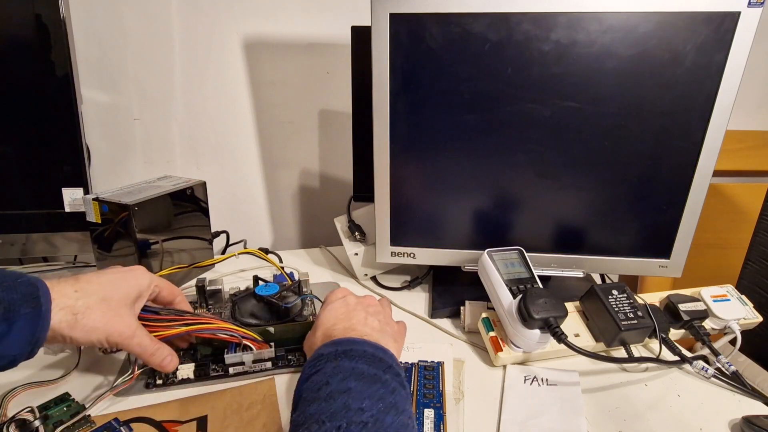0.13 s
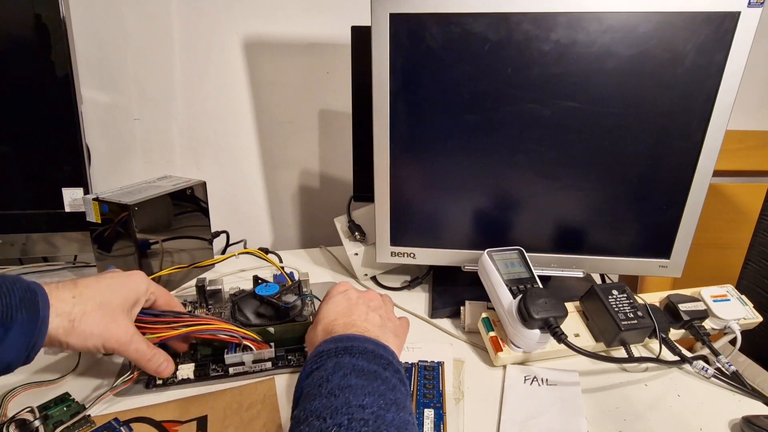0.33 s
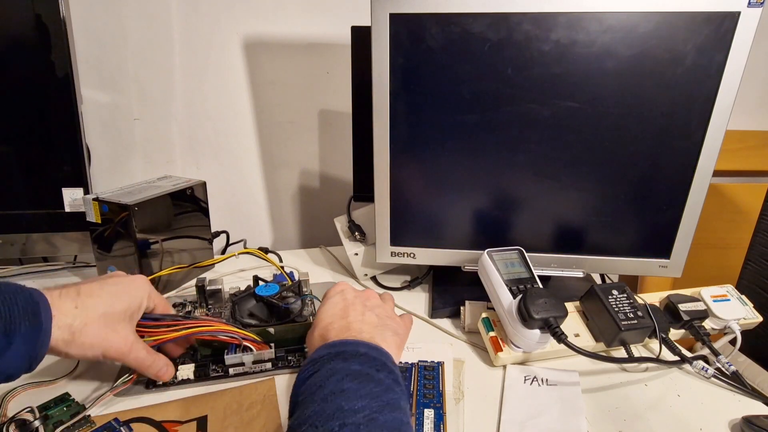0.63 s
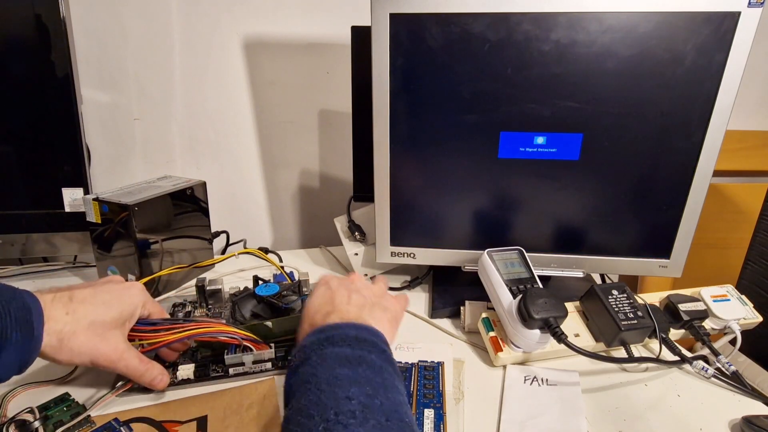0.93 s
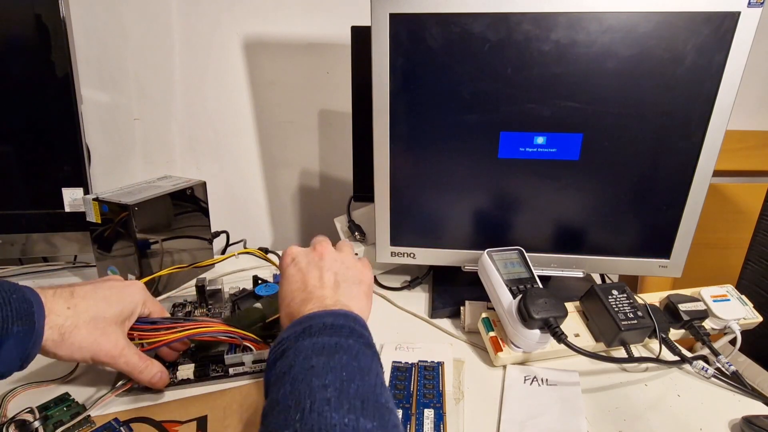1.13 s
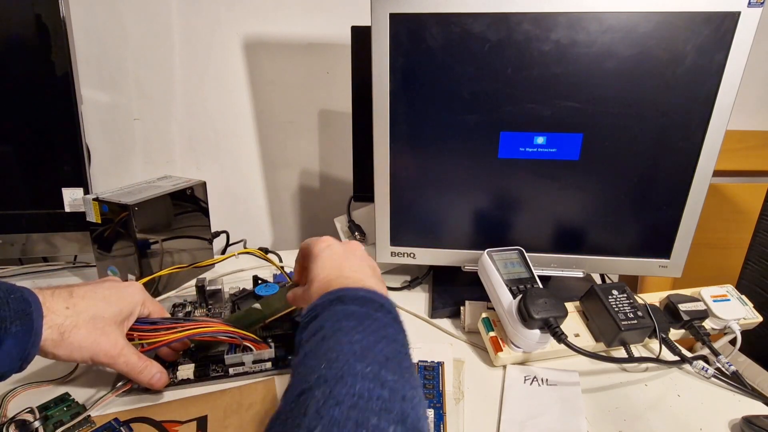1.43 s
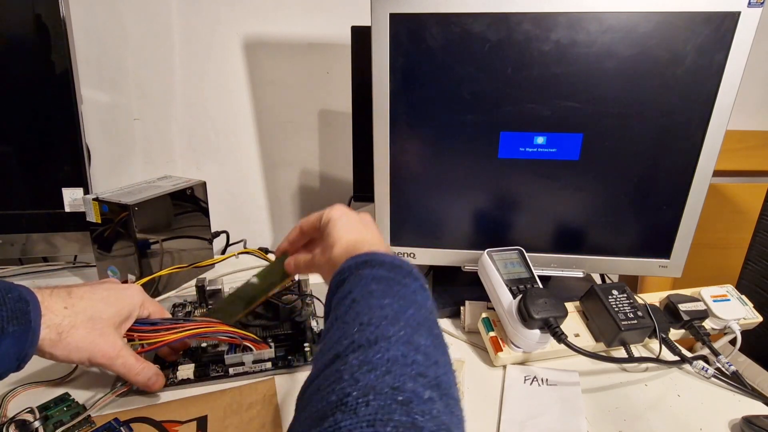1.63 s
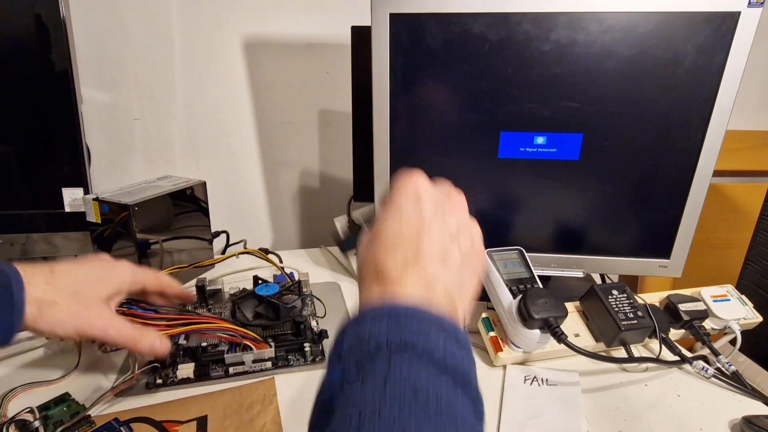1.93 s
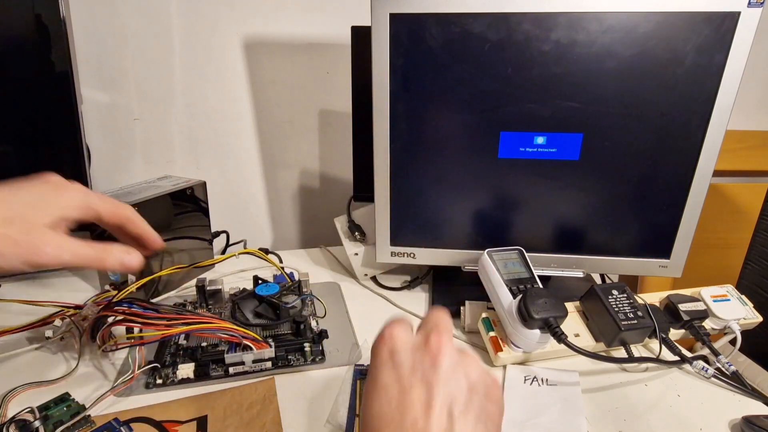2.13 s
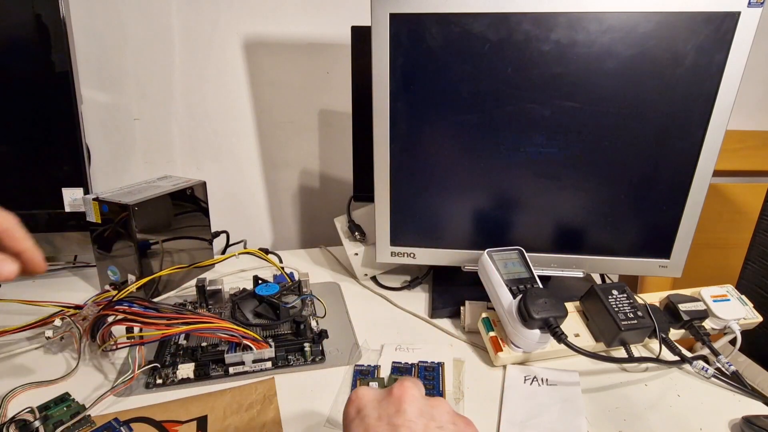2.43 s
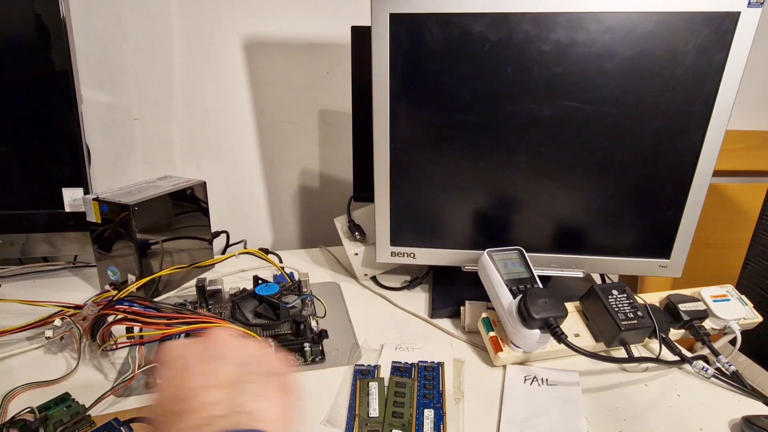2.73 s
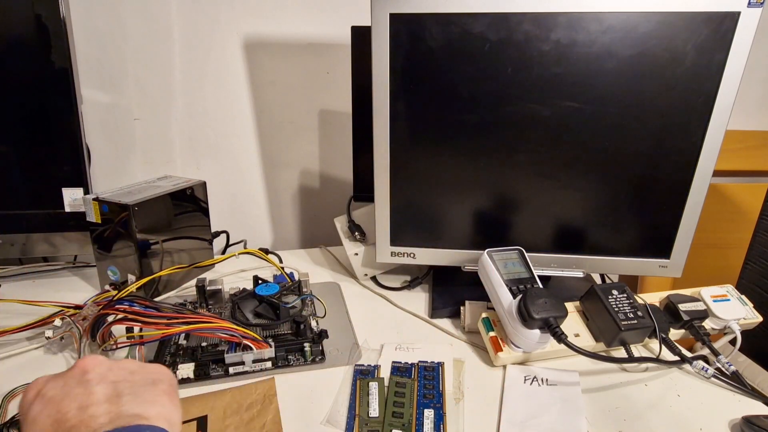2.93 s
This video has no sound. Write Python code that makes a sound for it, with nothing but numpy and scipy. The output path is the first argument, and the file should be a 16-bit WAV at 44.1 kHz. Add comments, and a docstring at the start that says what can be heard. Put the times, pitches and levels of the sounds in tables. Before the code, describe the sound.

A memory stick is worked out of a circuit board close by, with fumbling fingers, dull knocks on a desk and small plastic snaps. It then drops onto other sticks with a bright clatter, in a small quiet room.

```python
"""A memory stick is worked out of a motherboard, then tapped and dropped on a pile of other sticks.
First fingers fumble among the parts, the board rocks and knocks on the desk, the plastic latches
snap and the stick twangs in its slot. Then it lands with a bright clatter, bending, ringing and
bouncing. Each hit is made of fading tones and short bursts of noise. The small room adds a brief
echo and a quiet rumble."""
import sys
import numpy as np
from scipy import signal
from scipy.fft import rfft, irfft
from scipy.io import wavfile

SR = 44100
rng = np.random.default_rng(int(sys.argv[2]) if len(sys.argv) > 2 else 0)


def inscribe(sig):
    """Save sig as 16-bit PCM at rate SR to the path in sys.argv[1].

    A 1-D sig is mono; a 2-D sig holds one channel per row.
    Samples are clipped to [-1, 1] before scaling.
    """
    pcm = np.round(np.clip(np.atleast_2d(sig).T, -1, 1) * 32767)
    wavfile.write(sys.argv[1], SR, pcm.astype(np.int16))


N = 136710
TAIL = SR // 2  # samples in one ringing sound
T = np.arange(TAIL) / SR

# Tone colours of stick on stick, plastic slot and latch: (frequency [Hz], relative level [dB])
STICK_COLOUR = [(200, -8), (500, -2.5), (800, -10), (1200, -8.5), (1600, -4), (2200, -4), (3200, 0.5),
                (5000, -2), (7200, 1), (10000, -3.5), (15500, 0)]
SLOT_COLOUR = [(450, -27.5), (650, -2.5), (900, -11), (1150, -8.5), (1340, 5), (1500, -2), (1750, -1),
               (2200, 2), (2700, -8), (3300, -18.5), (5000, -37)]
LATCH_COLOUR = [(1500, -20.5), (2600, -7.5), (4000, -1.5), (5600, -9), (7700, -4.5), (9500, -18),
                (13000, -31.5)]
# A fade time is how long a sound takes to drop by 60 dB.
STICK_FADE_S, SLOT_FADE_S, LATCH_FADE_S = 0.022, 0.02, 0.051


def falling_stick():
    """The stick taps, lands and bounces on the pile: it clacks, bends and rings, and the desk thumps."""
    # Each touch: (time [s], clack [dB], brightness [dB/octave], bend [dB], ring [dB], thump [dB],
    # rise time [s])
    landings = [(2.1961, -46, -2.5, -59, -47.5, -53, 0.00027),
                (2.1981, -38.5, -1, -57, -69, -72.5, 0.00044), (2.3552, -52, 2, -92, -62, -77.5, 0.00056),
                (2.521, -59, -3, -70, -74, -78.5, 0.005), (2.5774, -36.5, -2, -48, -47.5, -65, 0.00058),
                (2.5798, -22, 3, -43, -35.5, -48.5, 0.00043), (2.5828, -18.5, 1.5, -27, -30, -32, .0009),
                (2.591, -27.5, 4.5, -43.5, -46.5, -42.5, 0.00071),
                (2.611, -34, 3.5, -49.5, -39.5, -57, 0.00058),
                (2.6255, -20.5, 10, -53.5, -32.5, -65, 0.001),
                (2.6286, -20.5, 3.5, -42, -26.5, -48, 0.0007), (2.638, -31, 1.5, -48, -41, -59, 0.0012)]
    # Tones of the stick bending, its clearest high ringing, and the desk under the pile:
    # (frequency [Hz], relative level [dB], fade time [s])
    bend_tones = [(1145, -6, 0.019), (1237, 0, 0.023), (1370, -7, .025), (2068, 2, 0.07), (2134, 0, 0.089),
                  (2236, 1, 0.055), (2307, 0.5, 0.036), (2870, -5.5, .05)]
    high_tones = [(6210, -2, .09), (6445, -2, .1), (6560, -4, .1), (6967, -1, .1), (7314, -1, .12),
                  (7590, -2, .11), (8367, -3, .07), (12846, -1, .07), (13631, -2, .07), (15203, -1, .07)]
    desk_tones = [(133.4, 1, 0.15), (265, 3, 0.051), (272, -10, 0.08), (402, -13.5, .05)]
    # The stick's many close high tones, heard as a shimmer: (frequency [Hz], relative level [dB])
    shimmer_colour = [(3500, -27), (4500, -2.5), (5600, -17), (6300, 2), (7600, 1.5), (8800, -9),
                      (11500, -11), (13000, -7), (14300, -12), (15300, -2)]
    out = np.zeros((2, N))
    for time, clack_db, brightness, bend_db, ring_db, thump_db, rise in landings:
        add(out, time, from_db(clack_db) * crack(STICK_COLOUR, STICK_FADE_S, brightness, rise))
        add(out, time + rise, from_db(bend_db) * ring(bend_tones))
        add(out, time + rise, from_db(thump_db) * ring(desk_tones))
        add(out, time, from_db(ring_db) * crack(shimmer_colour, fade_s=0.075, rise_s=rise))
        for channel in out:  # left and right ring a little differently
            start = time + rise + rng.uniform(0, 0.00036)
            add(channel, start, 0.55 * from_db(ring_db) * ring(high_tones))
    add(out, 2.594, chatter())
    return out


def chatter(length_s=0.03, level_db=-35):
    """Between bounces the stick rattles on the pile in a quick run of tiny touches."""
    touches = rms_one(play(random_touches(per_s=900), crack(STICK_COLOUR, STICK_FADE_S, tilt_db=2)))
    swell = signal.windows.tukey(int(length_s * SR))
    return from_db(level_db) * swell * touches[:, -len(swell):]


def stick_twangs(rise_s=0.0015):
    """Held at one end by the slot, the stick twangs as it is levered out."""
    # Each twang: (time [s], level [dB], hardness [dB/octave])
    twangs = [(1.088, -44.5, 19), (1.114, -46, 12), (1.126, -44.5, -3), (1.351, -53, -9), (1.637, -54, 14)]
    # Tones of the held stick: (frequency [Hz], relative level [dB], fade time [s])
    twang_tones = [(264, 0, .1), (545, -5, .068), (900, -25, .035), (1324, -36, .04)]
    soft_start = 1 - np.exp(-T / rise_s)  # fingertips are soft
    out = np.zeros((2, N))
    for time, db, hardness in twangs:
        add(out, time, from_db(db) * unit_hit(soft_start * ring(twang_tones, hardness)))
    return out


def latch_snaps():
    """The hollow plastic latch springs back and rings briefly."""
    # Each snap: (time [s], level [dB], hardness [dB/octave])
    snaps = [(1.087, -46, 8), (1.119, -53, 0), (1.3415, -55.5, -7), (1.638, -56, -2)]
    # Tones of the latch: (frequency [Hz], relative level [dB], fade time [s])
    latch_tones = [(1195, 0, .034), (1285, -4, .022), (2190, -2, .035), (2860, -3, .022), (3610, -12, .03)]
    out = np.zeros((2, N))
    for time, db, hardness in snaps:
        add(out, time, from_db(db) * ring(latch_tones, hardness))
    return out


def motherboard():
    """Each contact makes the plastic slot and its latch snap, then shakes the board and the desk."""
    # Each contact, with relative levels: (time [s], desk thump [dB], board knock [dB], slot clack [dB],
    # latch click [dB], sharp edge [dB], hardness [dB/octave], rise time [s])
    contacts = [(.152, -57, -48, -57, -57.5, -111, -12, 0.0032),
                (0.18, -55, -84, -55, -59, -73, 46, 0.0018), (.236, -54, -51.5, -96, -85, -74, -36, 0.0057),
                (.348, -88, -47, -89, -71, -78, -28, 0.007), (.421, -54, -57, -65, -50, -88, -12, 0.00075),
                (0.653, -39.5, -43.5, -40.5, -48.5, -51, -1, 0.015),
                (0.6732, -23.5, -29.5, -41.5, -51.5, -56, -9, 0.0006),
                (.709, -14.5, -25.5, -29.5, -35, -33.5, 8.5, 0.0022),
                (0.7753, -36, -23, -24.5, -44, -60, -16, 0.0005),
                (.783, -37, -31, -29, -67, -67, -26, 0.00031),
                (0.7902, -46, -31.5, -44, -60, -74, 0, 0.00049),
                (.797, -63, -63, -30, -57, -74, -20, .0005),
                (0.917, -47, -50.5, -80, -60, -71, -22, 0.0024),
                (1.024, -66, -54.5, -69, -129, -88, 11, 0.0028),
                (1.0847, -66, -69, -42.5, -45, -44.5, 27, 0.0014),
                (1.114, -74, -51, -42, -52.5, -54, 7, 0.0025),
                (1.125, -86, -51.5, -43.5, -59.5, -65, -13.5, 0.0018),
                (1.339, -79, -49.5, -64, -54, -58.5, -23, 0.0011),
                (1.353, -63, -53.5, -60.5, -71, -65, -9.5, 0.0048),
                (1.416, -62.5, -52, -54, -61.5, -84, -0.5, 0.0063),
                (1.466, -54, -62, -59.5, -73, -75, 46, 0.008),
                (1.5615, -62, -43, -46.5, -83, -101, -22, 0.001),
                (1.573, -66, -50.5, -54, -80, -95, -12, 0.0028),
                (1.636, -74, -75, -44, -79, -77, -33, 0.0014),
                (1.668, -79, -59, -53.5, -52.5, -98, 31, 0.002),
                (1.917, -67, -55, -70, -70.5, -73, -41, 0.0028)]
    # Tones of the desk and the board: (frequency [Hz], relative level [dB], fade time [s])
    desk_tones = [(69.8, -11, 0.037), (118, -11.5, 0.04), (128.7, 1.5, 0.14), (160.3, -5, 0.066),
                  (267, -2.5, 0.05)]
    board_tones = [(220, -14.5, 0.014), (279.5, -11, 0.08), (306.5, 11.5, 0.025), (360, 4, 0.044),
                   (416, -2.5, 0.086), (556, -19, 0.059), (655, -7.5, 0.0099)]
    # The sharp, high edge of a snap: (frequency [Hz], relative level [dB])
    edge_colour = [(6000, -59), (9500, -14), (12000, -6.5), (15500, -5)]
    out = np.zeros((2, N))
    for time, thump_db, knock_db, clack_db, click_db, edge_db, hardness, rise in contacts:
        shake_time = time + 0.0018  # heavy parts start to move just after the snap
        push = 1 - np.exp(-T / (0.78 * rise))  # a soft contact sets them moving gently
        add(out, shake_time, from_db(thump_db - 6) * unit_hit(push * ring(desk_tones)))
        add(out, shake_time, from_db(knock_db - 6) * unit_hit(push * ring(board_tones, hardness)))
        add(out, time, from_db(clack_db - 8.5) * crack(SLOT_COLOUR, SLOT_FADE_S, 0.2 * hardness, rise))
        add(out, time, from_db(click_db - 2.5) * crack(LATCH_COLOUR, LATCH_FADE_S, rise_s=rise))
        add(out, time, from_db(edge_db - 3) * crack(edge_colour, fade_s=0.02, rise_s=rise))
    return out


def fingers():
    """Fumbling fingers make soft bumps on the board and tiny ticks of plastic and cables."""
    # How loud the fumbling is: (time [s], level [dB])
    loudness = [(0, -68), (0.252, -66), (.55, -76), (.88, -62.5), (1.0, -85), (1.27, -86), (1.45, -67),
                (1.801, -64), (1.951, -74), (2.148, -87)]
    # The dull sound of a finger on the board: (frequency [Hz], relative level [dB])
    bump_colour = [(60, -16), (130, -5), (240, -1), (340, 0), (450, -5), (620, -20), (1000, -45),
                   (2000, -70)]
    bump_touches = random_touches(per_s=110)
    one_bump = crack(bump_colour, fade_s=0.012, rise_s=0.003)[0]
    bumps = from_db(-3.5) * rms_one(play(bump_touches, one_bump))
    tick_touches = random_touches(per_s=700)
    one_tick = crack(LATCH_COLOUR, LATCH_FADE_S) + 0.061 * crack(SLOT_COLOUR, SLOT_FADE_S)
    ticks = rms_one(play(tick_touches, one_tick))
    level_db = np.interp(np.arange(N) / SR, *np.transpose(loudness))
    return from_db(level_db) * (bumps + ticks)


def room_echo(delay_s=0.0075, build_s=0.0015):
    """The small room's answer to one click: a wash of sound that dies away octave by octave."""
    # How long the echo lasts: (frequency [Hz], fade time [s])
    fade_times = [(100, .26), (400, .255), (2000, .25), (7000, .245), (15000, .215)]
    # How strong the echo is: (frequency [Hz], relative level [dB])
    echo_levels = [(100, -18.5), (300, -5.5), (700, -0.5), (2000, -4), (7000, -2), (15000, -15.5)]
    white_spectrum = rfft(noise([(20, 0), (20000, 0)], TAIL))
    octave = np.log2(np.clip(np.fft.rfftfreq(TAIL, 1 / SR), 62.5, 16000))
    build_up = 1 - np.exp(-np.maximum(T - delay_s, 0) / build_s)
    out = 0
    for hz in np.geomspace(62.5, 16000, 9):
        fade = build_up * from_db(-60 * T / at_hz(fade_times, hz))
        band = irfft(white_spectrum * np.maximum(1 - abs(octave - np.log2(hz)), 0), TAIL)
        out = out + from_db(at_hz(echo_levels, hz)) * band * fade / np.sqrt(np.sum(fade ** 2))
    return out


def background(level_db=-70):
    """The room's steady low rumble and faint hiss."""
    # Tone colour of the quiet room: (frequency [Hz], relative level [dB])
    rumble_colour = [(15, -28.5), (25, -5.5), (97, -5), (130, -4), (242, -9), (463, -19), (1000, -21),
                     (2200, -22), (3200, -27), (7500, -27), (11000, -32), (16000, -37)]
    return from_db(level_db) * noise(rumble_colour, N)


def ring(tones, tilt_db=0, spread_db=3):
    """One blow as fading tones; a harder blow (more tilt) favours high ones, and no two are alike."""
    out = 0
    for hz, db, fade_s in tones:
        start_db = db + tilt_db * np.log2(hz) + spread_db * rng.standard_normal()
        out = out + from_db(start_db - 60 * T / fade_s) * np.sin(2 * np.pi * hz * T)
    return unit_hit(out)


def crack(colour, fade_s, tilt_db=0, rise_s=0):
    """A struck part whose many close tones blur into noise; a soft touch swells and lasts longer."""
    t = T[:TAIL // 4]
    rise_s = max(rise_s, 1e-5)
    swell = 1 - np.exp(-t / rise_s)
    fade = from_db(-60 * t / (fade_s + 20 * rise_s))
    return unit_hit(noise(colour, len(t), likeness=0.48, tilt_db=tilt_db) * swell * fade)


def noise(colour, size, likeness=None, tilt_db=0):
    """Stereo noise with a tone colour, tilted by tilt_db per octave above 500 Hz."""
    # How alike left and right are for sound from all around: (frequency [Hz], likeness [0 to 1])
    room_likeness = [(60, 0.94), (300, 0.64), (700, 0.12), (1500, 0.16), (16000, .02)]
    hz = np.fft.rfftfreq(size, 1 / SR)
    if likeness is None:
        likeness = at_hz(room_likeness, hz)
    middle, side = rfft(rng.standard_normal((2, size)))
    stereo = np.sqrt(1 + likeness) * middle + np.sqrt(1 - likeness) * side * [[1], [-1]]
    gain = from_db(at_hz(colour, hz) + tilt_db * np.log2(np.maximum(hz, 500)))
    return rms_one(irfft(gain * stereo, size))


def random_touches(per_s, spread_db=2.5):
    """Tiny pushes at random moments, of uneven strength."""
    happens = rng.random(N) < per_s / SR
    direction = rng.choice([-1, 1], N)
    strength = from_db(spread_db * np.minimum(rng.exponential(1, N), 4))
    return happens * direction * strength


def from_db(db):
    """Turn decibels into a number to multiply by."""
    return 10 ** (np.asarray(db) / 20)


def at_hz(points, hz):
    """Read between the rows of a frequency table, with octaves evenly spaced."""
    frequencies, values = np.transpose(points)
    return np.interp(np.log(np.maximum(hz, 1)), np.log(frequencies), values)


def rms_one(x):
    """Scale a sound so that its average strength (rms) is 1."""
    return x / np.sqrt(np.mean(x ** 2) + 1e-20)


def unit_hit(x, window_s=0.023):
    """Give a hit the energy of a sound of strength 1 that lasts window_s."""
    return rms_one(x) * np.sqrt(window_s * SR / x.shape[-1])


def add(out, time, x):
    """Mix x into out, starting at a time in seconds."""
    start = int(time * SR)
    out[..., start:start + x.shape[-1]] += x[..., :N - start]


def play(x, response):
    """Let every sample of x set off a copy of the response."""
    return signal.fftconvolve(np.atleast_2d(x), np.atleast_2d(response), axes=-1)[:, :N]


def place(x, lag_s, pan_db):
    """Move a sound to the left: the right side hears it lag_s later and pan_db quieter."""
    samples = np.arange(N)
    late_right = np.interp(samples - lag_s * SR, samples, x[1])
    return np.array([x[0] * from_db(pan_db / 2), late_right * from_db(-pan_db / 2)])


def scene():
    """The board on the left, the pile of sticks in the middle, and the room around them."""
    board = motherboard() + stick_twangs() + latch_snaps() + fingers()
    board = place(board, lag_s=0.00012, pan_db=2.6)
    pile = place(falling_stick(), lag_s=0.00004, pan_db=0)
    low_cut = signal.butter(3, 70, "high", fs=SR, output="sos")
    board, pile = signal.sosfilt(low_cut, [board, pile])
    echo = play(from_db(-2) * board + pile, room_echo())  # the board is nearer, so it echoes less
    return board + pile + echo + background()


def record(dry):
    """Cut away the very highest treble steeply."""
    cutoff_hz = 15850
    return signal.sosfilt(signal.ellip(12, 0.2, 100, cutoff_hz, fs=SR, output="sos"), dry)


dry = scene()
out = record(dry)
inscribe(out)
```